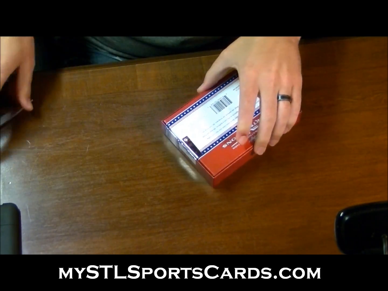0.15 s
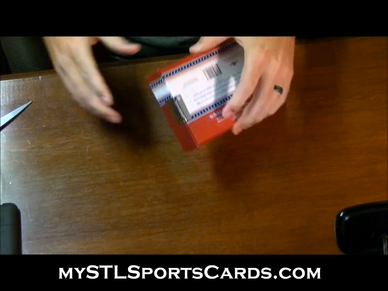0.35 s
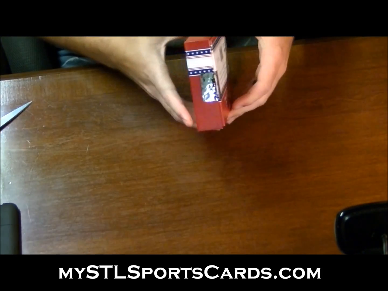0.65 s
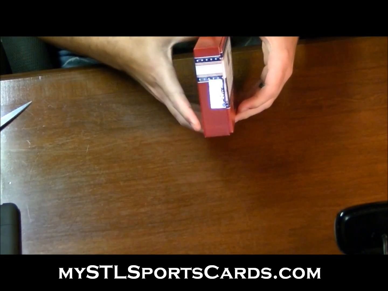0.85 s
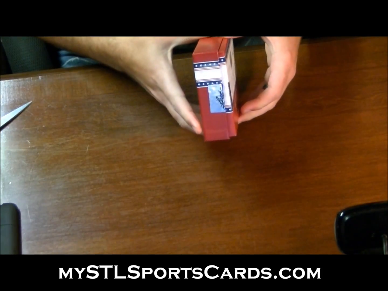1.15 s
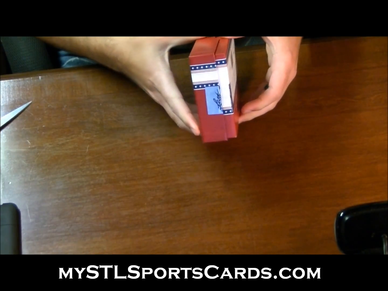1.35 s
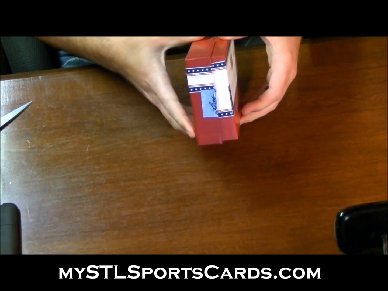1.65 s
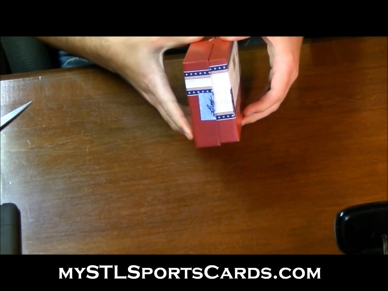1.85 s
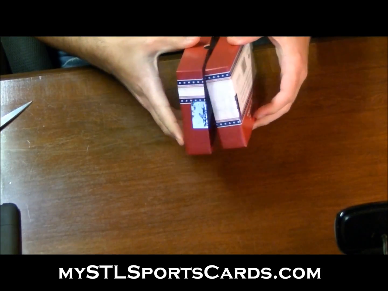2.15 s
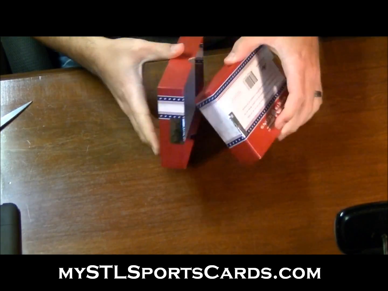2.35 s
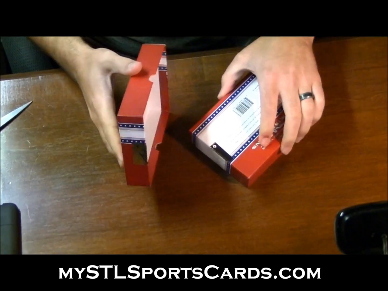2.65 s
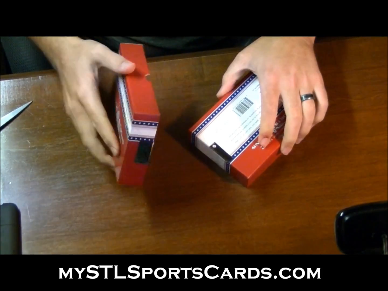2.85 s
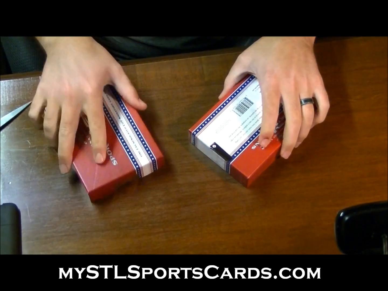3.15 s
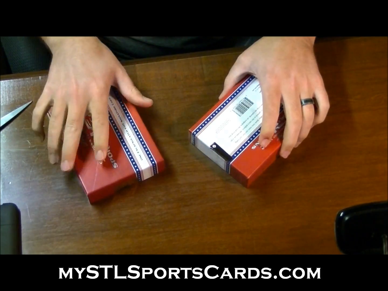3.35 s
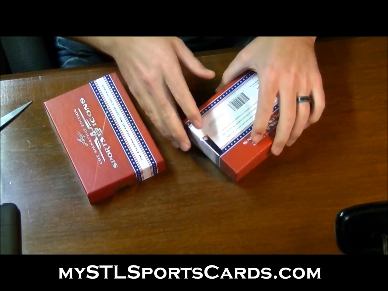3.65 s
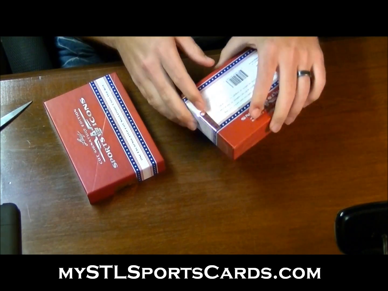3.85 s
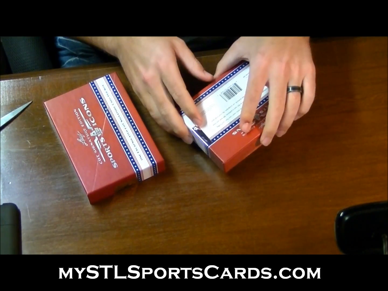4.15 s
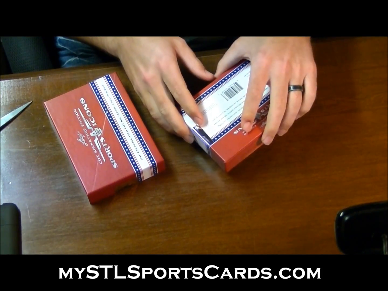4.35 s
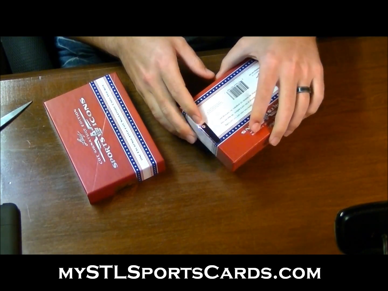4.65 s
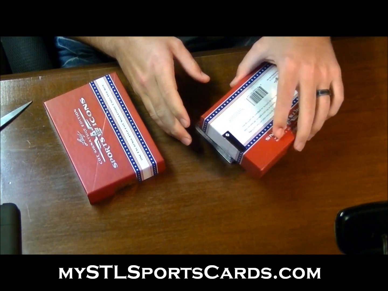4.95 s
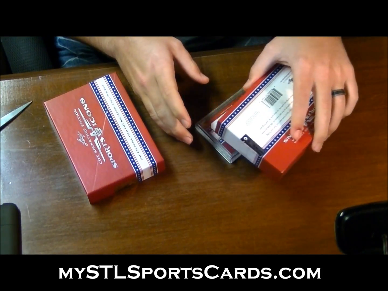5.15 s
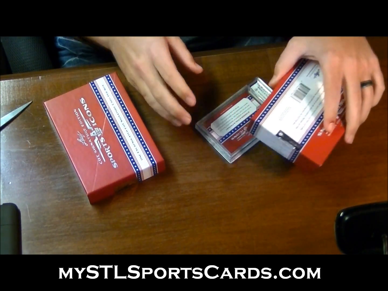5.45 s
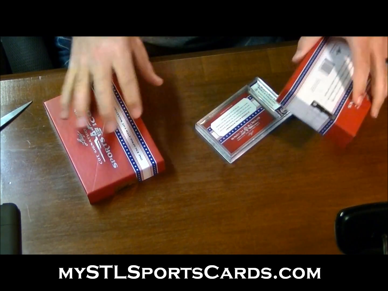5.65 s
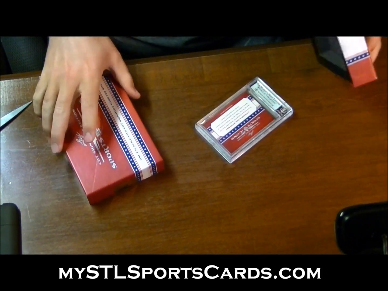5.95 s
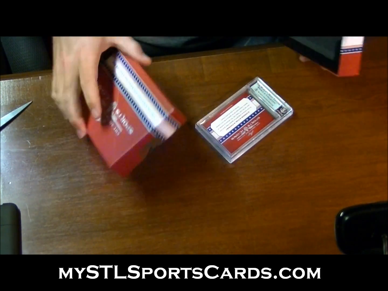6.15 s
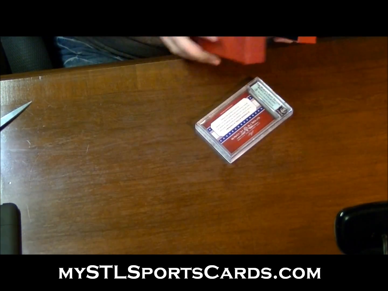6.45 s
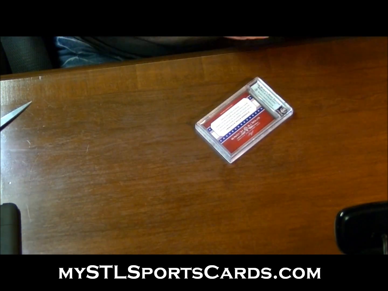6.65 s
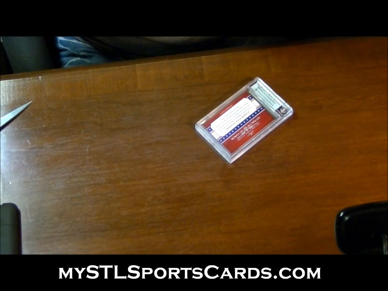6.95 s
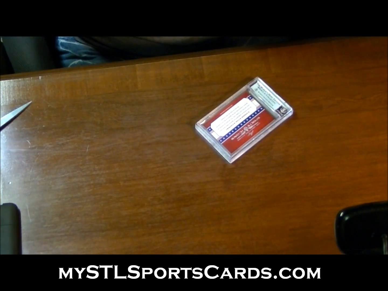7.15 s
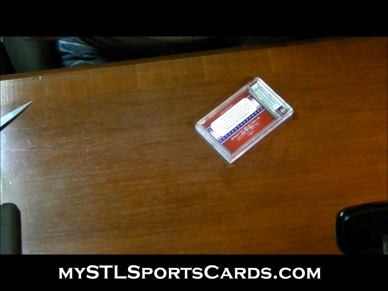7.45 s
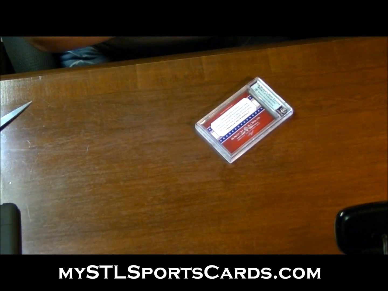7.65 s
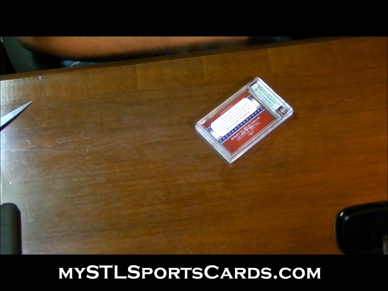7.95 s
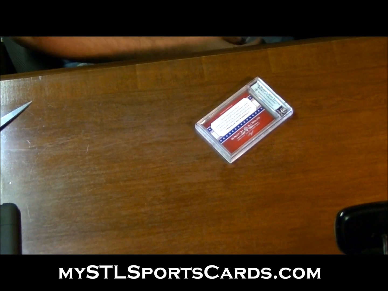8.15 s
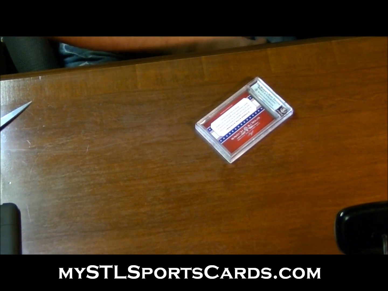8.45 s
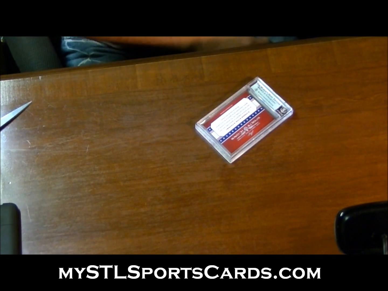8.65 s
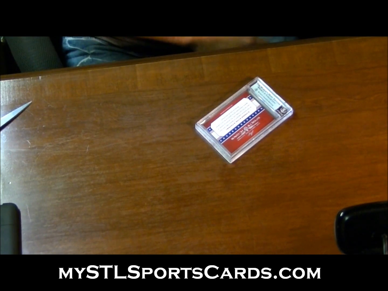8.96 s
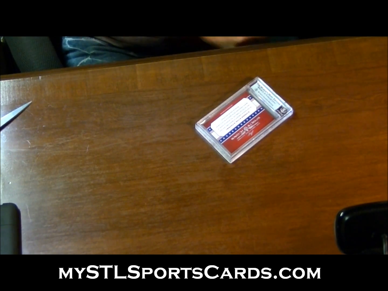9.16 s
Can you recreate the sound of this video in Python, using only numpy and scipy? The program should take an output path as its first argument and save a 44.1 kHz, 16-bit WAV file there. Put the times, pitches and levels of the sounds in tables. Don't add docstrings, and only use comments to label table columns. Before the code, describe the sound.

A quiet small furnished room with a steady soft ventilation hush, close stereo microphone at a wooden desk. At 0.15-0.3 s steel scissors clatter down with a sharp crack and short scraping bounces. Light taps and a soft low wrist thump follow around 0.55, a nail tick at 0.87. Cardboard rubs faintly from 0.8, growing until the lid lets go at 2.02-2.06 with two tiny squeaks. At 2.56 the box base lands, a loud hollow double knock with desk boom; at 3.18 the lid knocks, duller, with small settling touches. Soft handling leads to plastic holder knocks and rattle at 4.02-4.18. Near quiet until faint padded bumps at 5.9. From 6.54 to 6.9 the halves meet and seat further off, with muffled bumps and rubbing until 7.5, faint touches to 8. A forearm brushes at 8.5 and lands softly at 8.79, fading by 9.2 into hush.

```python
import sys
import numpy as np
from scipy import signal
from scipy.fft import rfft, irfft, next_fast_len
from scipy.io import wavfile
from scipy.ndimage import uniform_filter1d

SR = 44100
rng = np.random.default_rng(int(sys.argv[2]) if len(sys.argv) > 2 else 0)


def boost(x):
    u = np.asarray(x, float) / 20
    return 10 ** u


def materialize(psi):
    bounded = np.clip(np.atleast_2d(psi).T, -1, 1)
    quanta = np.round(bounded * 32767).astype(np.int16)
    wavfile.write(sys.argv[1], SR, quanta)


N = 410129

# (time [s], peak [dB], ring [Hz], crack [dB], ring [dB])
SCISSORS = [
    (0.137, -19.5, 2100, -1.5, -9),
    (0.161, -8.5, 1730, -0.5, -11),
    (0.168, -16.5, 1020, 6.5, 0),
    (0.177, -14.5, 1480, 1, -18),
    (0.217, -13, 1730, -9, -9),
    (0.235, -16, 2060, -14, -6),
    (0.299, -27, 974, -24, -1),
]
# (time [s], peak [dB], crack [dB], ring [dB], contact [ms])
BASE_KNOCKS = [
    (2.5552, 0, -15, -11.5, 0.59),
    (2.5582, -6, -15, -12.5, 0.95),
    (2.5685, -5.5, -20, 5, 3),
    (2.582, -19, -35, 0, 4),
    (2.61, -25, -40, 3, 5),
    (2.644, -27.5, -40, 8, 3.55),
]
# (time [s], peak [dB], crack [dB], ring [dB], contact [ms])
LID_KNOCKS = [
    (3.1805, -10, -40, 6, 0.53),
    (3.1885, -1, -33, 4, .9),
    (3.1985, -3, -22, -21, 0.55),
    (3.215, -17, -30, 5, 4.2),
    (3.234, -23, -30, -8, 4),
    (3.277, -34, -40, 6, 4),
    (3.382, -37.5, -55, 8.5, 2.4),
    (3.398, -33.5, -40, -1, 3),
    (3.459, -51, -32, 4, 2.1),
    (3.553, -42.5, -33, 3, 6.5),
]
# (time [s], peak [dB], crack [dB], ring [dB], contact [ms])
HOLDER_KNOCKS = [(3.984, -32.5, -13.5, -1, 1.94), (4.0205, -2.5, -25.5, 8, 1.83), (4.033, -8, -24, 4, 2.03),
                 (4.044, -11, -28.5, 5, 1.7), (4.054, -20, -28.5, 3, 5), (4.0785, -8, -14, 4.5, 2.5),
                 (4.099, -18, -19.5, -2, 1.86), (4.1113, 0, -7, 3, 0.5), (4.1172, -17, -16, -4, 0.78),
                 (4.123, -17, -22, 5, 2.7), (4.148, -25, -31, 2, 3.2), (4.182, -33, -30, 6, 2.3)]
# (time [s], peak [dB], ring [Hz], crack [dB], ring [dB])
TAPS = [
    (0.517, -35.5, 1100, -28, -6),
    (0.548, -29.5, 359, -22, 1),
    (1.824, -40, 1126, -31.5, -2),
    (2.067, -37, 334, -14, 14),
    (2.331, -41, 936, -33.5, -11),
    (2.826, -41.5, 298, -28.5, 4),
]
# (time [s], peak [dB], ring [Hz], crack [dB], ring [dB])
ELBOW = [
    (8.689, -29, 580, -26.5, -6),
    (8.737, -26, 375, -23.5, -6.5),
    (8.786, -18.5, 463, -30, -7.5),
    (8.795, -17.5, 363, -25, -3),
    (8.82, -30.5, 1000, -24.5, 2),
]
# (time [s], peak [dB], ring [Hz], crack [dB], ring [dB])
TICKS = [
    (.860, -35, 1140, -26, 3),
    (.8715, -38, 1040, -30, 0),
    (4.5045, -37, 2200, -24.5, -9.5),
    (7.557, -37, 2433, -31, -14),
    (7.5585, -45, 2930, -22, 0),
]
# (time [s], peak [dB], ring [Hz], crack [dB], ring [dB])
REFIT = [
    (6.541, -15, 791, -14.5, -11.5),
    (6.575, -25, 824, -32.5, -6),
    (6.652, -32.5, 753, -28, 9),
    (6.661, -27.5, 2310, -30, -6),
    (6.667, -30.5, 1350, -33, -5.5),
    (6.829, -22, 706.6, -29, -11.5),
    (6.89, -36.5, 330, -32, 6),
    (6.598, -40, 355, -35, 6),
    (7.983, -40.5, 443.8, -29, -5.5),
]
# (time [s], peak [dB], ring [Hz], crack [dB], ring [dB])
SNAGS = [
    (.168, -22.5, 7000, 4, -6),
    (.222, -25, 2280, 0, -7),
    (.017, -41.5, 1750, -2.5, -8),
    (2.026, -37, 1140, -12, -6),
    (2.054, -33, 2000, -4, -9),
    (2.878, -41.5, 1859, -28.5, 0),
]
# (time [s], peak [dB], ring [Hz], crack [dB], ring [dB])
BUMPS = [(5.850, -46, 860, -35, 0), (5.862, -46, 1000, -35, -5), (5.877, -39, 722, -34, -5),
         (5.888, -42.5, 620, -35, 1), (5.905, -46, 597, -40, 4), (5.965, -39, 760, -39, -1),
         (5.99, -47, 402, -39, 0), (7.053, -37.5, 446, -32, 10), (7.239, -35.5, 413, -30, 9),
         (7.247, -34.5, 414, -30, 9), (7.260, -36, 432, -30, 4), (7.274, -38.5, 410, -30, 3),
         (7.289, -43, 413, -30, 3), (7.377, -35.5, 387, -30, 4), (7.398, -37, 370, -27, 6),
         (7.415, -41, 368, -29.5, 1), (7.639, -42.5, 383.6, -21, 4), (7.805, -40.5, 322, -29, 2)]

# (frequency [Hz], level [dB per Hz])
STEEL = [(200, -14), (449, -6.5), (663, -45), (1010, -3), (1090, -3.5), (1730, -4.5), (2290, -6.5),
         (2550, -5), (5000, -20), (6500, -47)]
# (frequency [Hz], level [dB per Hz])
BASE_BODY = [(200, -18), (729, -4.5), (868, -7.5), (1170, -2.5), (1450, -11.5), (1700, -6), (2380, -6.5),
             (3200, -11.5), (5000, -31), (6500, -66.5)]
# (frequency [Hz], level [dB per Hz])
LID_BODY = [(200, -29), (338, -11), (480, -30), (570, -28), (790, -9.5), (1250, -7), (1500, -13),
            (1850, -6.5), (2550, -20), (3080, -17), (5000, -48.5), (6500, -74)]
# (frequency [Hz], level [dB per Hz])
HOLDER_BODY = [(200, -29), (357, -28), (443, -27.5), (603, -48), (892, -8), (1250, -22.5), (1800, -15),
               (2140, -19), (2500, -18), (3400, -25), (5000, -34.5), (6500, -69)]
# (frequency [Hz], level [dB per Hz])
CARD = [(200, -9.5), (347, -6), (549, -17.5), (812, -5), (967, -8), (1750, -14), (2230, -24.5),
        (3080, -24.5), (5000, -32.5), (6500, -63)]
# (frequency [Hz], level [dB per Hz])
NAIL = [(700, -30), (1050, 3), (1600, -6), (2600, -3.5), (5200, -18)]
# (frequency [Hz], level [dB per Hz])
HELD = [(200, -15), (400, -1), (550, -6), (800, -5.5), (1150, -6), (1400, -31), (3000, -36), (5200, -50)]
# (frequency [Hz], level [dB per Hz])
REFIT_BODY = [(200, -11), (350, -4.5), (550, -17), (800, -3), (1300, -7), (2000, -12), (3000, -16.5),
              (5000, -28)]

# (frequency [Hz], level [dB], 60 dB decay [s])
BASE_WALLS = [(417, -26, .06), (670, -14, 0.072), (1130, -12, .03), (2000, -14, .03), (2170, -10, .025),
              (2455, -16, .03), (3070, -10, .02)]
# (frequency [Hz], level [dB], 60 dB decay [s])
LID_WALLS = [(364, -16, .06), (1238, -14, .04), (1671, -16, .05), (1841, -12, .03), (2315, -18, .03),
             (3068, -16, .03)]
# (frequency [Hz], level [dB], 60 dB decay [s])
HOLDER_WALLS = [(362, -24, .06), (1400, -24, .05), (1830, -20, .04), (2480, -22, .04), (3450, -18, .035)]
# (frequency [Hz], level [dB], 60 dB decay [s])
REFIT_WALLS = [(355, -11.5, 0.073), (1760, -8, 0.035), (2094, -12, 0.039), (2945, -14, .03),
               (3970, -20, .02)]

# (start [s], peak [s], end [s], body [dB], hiss [dB])
SKID = [
    (0.135, 0.142, 0.18, -45, -39),
    (0.16, 0.168, 0.22, -44, -36),
    (0.19, 0.225, 0.3, -41.5, -40.5),
    (0.24, 0.265, 0.36, -44, -48),
]
# (start [s], peak [s], end [s], body [dB], hiss [dB])
SLIDE = [
    (.75, 1.1, 1.7, -64.5, -85),
    (1.2, 1.96, 2.32, -52.5, -69),
    (1.4, 1.58, 1.97, -66.5, -84),
    (2.0, 2.06, 2.123, -51.5, -46),
]
# (start [s], peak [s], end [s], body [dB], hiss [dB])
HANDLE = [(.52, .8, 1.1, -59, -83), (.9, 1.2, 1.7, -60, -82), (2.74, 2.82, 2.9, -59.5, -71),
          (2.82, 2.904, 3, -55.5, -78), (3.33, 3.356, 3.43, -55, -72), (3.45, 3.57, 3.82, -55.5, -74),
          (3.66, 3.76, 4.02, -73, -64.5), (3.92, 3.975, 4.08, -49.5, -56.5), (4.0, 4.02, 4.06, -29.5, -50),
          (4.2, 4.32, 5.1, -72, -71), (5.78, 5.87, 5.95, -61.5, -76.5), (6.54, 6.57, 6.7, -45.5, -57),
          (6.58, 6.7, 6.9, -54, -66.5), (6.815, 6.832, 6.855, -41, -53), (6.85, 7.09, 7.5, -55.5, -74),
          (7.19, 7.225, 7.25, -53, -56.5), (7.23, 7.265, 7.42, -48.5, -57.5), (7.3, 7.36, 7.38, -52, -57.5),
          (7.37, 7.42, 7.53, -53, -63.5), (7.62, 7.68, 7.78, -50.5, -60.5), (7.86, 7.9, 7.9, -59, -73.5),
          (7.93, 8.05, 8.1, -66, -73)]
# (start [s], peak [s], end [s], body [dB], hiss [dB])
ARM = [
    (8.46, 8.51, 8.6, -55.5, -60.5),
    (8.52, 8.6, 8.72, -52, -58),
    (8.6, 8.73, 8.84, -48, -58),
    (8.77, 8.792, 8.85, -41.5, -53),
    (8.78, 8.89, 9.04, -50.5, -60),
    (8.97, 9.06, 9.24, -64, -74.5),
]
# (start [s], peak [s], end [s], body [dB], hiss [dB])
RATTLE = [
    (4.018, 4.03, 4.07, -37, -57.5),
    (4.06, 4.085, 4.155, -41.5, -58),
    (4.095, 4.112, 4.14, -37, -71),
    (4.11, 4.14, 4.24, -48.5, -67.5),
]
# (start [s], peak [s], end [s], body [dB], hiss [dB])
CATCH = [
    (2.01, 2.024, 2.05, -39, -49),
    (2.045, 2.06, 2.14, -40, -58),
    (3.56, 3.76, 3.87, -61, -70),
    (6.56, 6.66, 6.76, -47.5, -62),
    (6.68, 6.8, 7.06, -53, -67.5),
]

# (frequency [Hz], width [Hz], level [dB])
SKID_BODY = [(1000, 610, 0), (1730, 240, 1.5), (2390, 1100, -4), (3500, 1300, -24.5)]
# (frequency [Hz], width [Hz], level [dB])
SLIDE_BODY = [(448, 103, -0.5), (850, 140, -1), (1202, 153, 5.5), (2010, 380, 1), (3200, 900, -7.5)]
# (frequency [Hz], width [Hz], level [dB])
HAND_BODY = [(221, 120, 3), (398, 150, 3), (854, 690, 3.5), (1300, 760, 5), (2200, 560, 3),
             (3600, 1400, -8)]
# (frequency [Hz], width [Hz], level [dB])
ARM_BODY = [(360, 510, -1), (696, 470, 1.5), (1260, 820, 5), (2560, 1650, 1), (3460, 670, 0.5)]
# (frequency [Hz], width [Hz], level [dB])
RATTLE_BODY = [(1324, 250, 5.5), (1800, 200, 1.5), (2478, 100, 4), (3400, 300, -7), (4496, 1205, -1.5)]
# (frequency [Hz], width [Hz], level [dB])
CATCH_BODY = [(1280, 110, 1.5), (1997, 152, 2.5), (2800, 760, -2), (3400, 200, -2), (3900, 140, -3),
              (5020, 400, -6)]
# (frequency [Hz], level [dB per Hz])
HISS = [(2060, -29), (3500, -2), (4040, -1), (4750, -7), (6520, -2.5), (8580, -8), (10100, -7), (11500, -5),
        (14300, -13), (15500, -35)]
# (start [s], length [s], pitch [Hz], end pitch [ratio], level [dB])
SQUEAKS = [(.005, 0.051, 1780, 0.93, -51), (0.076, 0.069, 1760, 0.95, -53), (2.011, .016, 2700, 1.2, -40),
           (2.02, 0.026, 3400, 0.97, -31.5), (2.018, 0.022, 5100, 0.95, -40), (2.022, .016, 6900, 1, -48),
           (2.032, 0.024, 1280, 1.03, -39), (2.050, .016, 2010, 1, -30.5), (2.054, 0.015, 2850, .98, -32.5),
           (2.053, .018, 3450, .97, -35), (2.049, 0.013, 5000, 1, -39), (2.055, .015, 6900, 1.03, -45),
           (5.19, .06, 480, 0.97, -59.5), (6.599, .055, 3450, 1, -52), (6.75, .05, 1280, 1, -55),
           (6.884, 0.027, 1190, .97, -49), (7.211, .025, 5300, 1, -55), (7.212, .022, 5900, 0.84, -57),
           (7.21, .025, 7350, 1, -57), (7.24, .025, 5300, 1.1, -57), (7.24, .025, 7350, 1, -56),
           (7.345, .025, 7200, 1, -57)]

# (frequency [Hz], 60 dB decay [s], level [dB])
ROOM = [(150, 0.11, -8.5), (391, 0.23, -2), (910, 0.14, -8), (2019, 0.24, -10.5), (4802, 0.31, -12.5),
        (9700, .13, -18)]
# (frequency [Hz], level [dB per Hz])
AIR = [(15, -62.5), (25, -28), (48, -12), (107, -7.5), (340, -9.5), (378, -6.5), (469, -5.5), (552, -13),
       (741, -14.5), (848, -8), (1170, -15.5), (2560, -20), (3440, -26), (14300, -38.5), (15500, -48.5)]
# (frequency [Hz], level [dB])
AIR_SIDE = [(25, -8), (60, -3), (110, -2.5), (200, 4.5), (380, 2.5), (700, 2), (1290, 1.5), (2380, 1),
            (4400, 1), (8120, 0.5), (15000, -3)]

# (pitch [Hz], second mode [ratio], its share [ratio])
BASE_RING, LID_RING, HOLDER_RING = (868, 0.745, 0.22), (775, 0.82, 0.36), (908, 0.93, 0.28)
LOOSE_PAIR = (1.13, 0.4)


def mode_crowd(t, body, body_t60, contact_ms, place, turn, late):
    count = len(place)
    hz = 200 + 5000 * ((np.arange(count)[:, None] + place) / count) ** 1.5
    since = np.maximum(t + np.log(1 - late) * contact_ms / 1000, 0)
    body_hz, body_db = np.transpose(body)
    level = boost(np.interp(np.log(hz), np.log(body_hz), body_db))
    gain = level * np.sign(turn - 0.5) * (hz / 1000) ** 0.7
    decay = fade(since, body_t60 * (1000 / hz) ** 0.5)
    return (gain * decay * np.sin(2 * np.pi * hz * since)).sum(axis=0)


def hollow_ring(t, hz, pair, t60):
    ratio, share = pair
    first = fade(t, t60) * np.sin(2 * np.pi * hz * t)
    second = share * fade(t, t60 / ratio ** 2) * np.sin(2 * np.pi * ratio * hz * t)
    return first + second


def wall_ring(t, walls, turn):
    total = 0
    for k, (hz, db, t60) in enumerate(walls):
        gain = (-1) ** k * boost(db + 8 * turn[k, 0] - 4)
        total = total + gain * fade(t, t60) * np.sin(2 * np.pi * hz * t)
    return total


def knocks(events, body, pair, body_t60, ring_t60, crack_t60, pan_db, walls=(), left=1, buzz_db=-8):
    low, high = np.zeros(N + SR), np.zeros((2, N + SR))
    t = np.arange(SR // 12) / SR
    treble = signal.butter(1, [3000, 11500], "band", fs=SR)
    for s, peak_db, ring_hz, crack_db, ring_db, contact_ms in events:
        place, turn, late = rng.random((3, 40, 1))
        noise = rng.standard_normal((2, len(t)))
        noise[0, 14] = 7
        crowd = mode_crowd(t, body, body_t60, contact_ms, place, turn, late)
        swell = 1 - np.exp(-1000 * t / max(contact_ms, 0.1))
        ring = swell * hollow_ring(t, ring_hz, pair, ring_t60)
        buzz = colour(noise[1], body) * fade(t, 1.5 * body_t60)
        thud = swell * (wall_ring(t, walls, turn) + boost(buzz_db) * peak_one(buzz))
        thud = thud + peak_one(crowd) + boost(ring_db) * peak_one(ring)
        crack = signal.lfilter(*treble, signal.lfilter(*treble, noise))
        crack = crack * fade(t, crack_t60) * np.minimum(t / 0.00026, 1)
        i = int(s * SR)
        span = slice(i, i + len(t))
        low[span] *= left + (1 - left) * np.exp(-t / 0.0008)
        low[span] += boost(peak_db) * peak_one(thud)
        high[:, span] += boost(peak_db + crack_db) * peak_one(crack)
    return ports(low[:N], high[:, :N], pan_db)


def loose(events, contact_ms, body, **decays):
    return knocks([(*row, contact_ms) for row in events], body, LOOSE_PAIR, **decays)


def hollow(events, ring, body, **decays):
    rows = [(s, db, ring[0], *rest) for s, db, *rest in events]
    return knocks(rows, body, ring[1:], **decays)


def rub(strokes, body, rate, grain_db, patchy_db, body_db, hiss_db, swell_db, bend):
    first, last = int(strokes[0][0] * SR), int(strokes[-1][2] * SR)
    size = 4096 * ((last - first) // 4096 + 1)
    gains, out = np.zeros((2, N)), np.zeros((2, N + size))
    happens = rng.random((2, size)) < np.array([[rate], [4 * rate]]) / SR
    slips = happens * boost(grain_db * rng.exponential(size=(2, size)))
    push = slips[0] * rng.standard_normal(size)
    low = np.zeros(size)
    for k, (hz, width, db) in enumerate(body):
        mode = band(band(push, hz, 1.8 * width), hz, 1.8 * width)
        low += (-1) ** k * boost(db) * mode / np.sqrt(width)
    low = unit(low)
    high = unit(colour(slips[1] * rng.standard_normal((2, size)), HISS))
    for start, peak, end, low_db, high_db in strokes:
        span = np.arange(int(start * SR), int(end * SR))
        slack = np.interp(span / SR, [start, peak, end], [1, 0, 1])
        press = boost(-swell_db * slack ** bend)
        gains[:, span] += [boost(low_db + body_db) * press, boost(high_db + hiss_db) * press ** 1.3]
    low_gain, high_gain = np.pad(gains, ((0, 0), (0, size)))[:, first:first + size]
    out[:, first:first + size] = ports(low * low_gain, high * high_gain, pan_db=1.0)
    return out[:, :N] * boost(patchy_db * walk(40))


def squeaks(rough):
    out = np.zeros(N)
    for s, length, hz, ratio, db in SQUEAKS:
        t = np.arange(int(length * SR)) / SR
        waver = uniform_filter1d(rng.standard_normal((2, SR // 8)), 130)[:, :len(t)] * 11
        glide = hz * ratio ** (t / length)
        phase = 2 * np.pi * np.cumsum(glide) / SR + rough * waver[0]
        swell = np.sin(np.pi * t / length) * (1 + 0.3 * rough * waver[1])
        i = int(s * SR)
        out[i:i + len(t)] += boost(db) * swell * np.sin(phase)
    return ports(out, np.zeros((2, N)), pan_db=0.0)


def desk(hits):
    t = np.arange(SR // 2) / SR
    boom = (1 - np.exp(-t / 0.023)) * fade(t, 0.34) * np.sin(2 * np.pi * 69.6 * t)
    wrist = boost(37) * (np.arange(N) == int(0.57 * SR))
    push = np.abs(hits) ** 0.54 + wrist
    return boost(-42.5) * signal.fftconvolve(push, boom)[:N] / 100


def room(x):
    t, tail = np.arange(SR // 2) / SR, 0
    for hz, t60, db in ROOM:
        mid, side = band(rng.standard_normal((2, len(t))), hz, hz)
        both = mid + min(hz / 1200, 1) * side * np.array([[1], [-1]])
        both = both * fade(t, t60) * np.minimum(t / 0.0079, 1)
        tail = tail + boost(db) * both / np.sqrt(t60 * SR / 14)
    return signal.fftconvolve(x[None], tail, axes=1)[:, :N]


def air():
    mid, side = rng.standard_normal((2, N))
    mid, side = colour(np.array([mid, colour(side, AIR_SIDE)]), AIR)
    gain = boost(-59.5) / np.sqrt(np.mean(mid ** 2))
    return gain * np.array([mid + side, mid - side]) * boost(np.array([[0.4], [-0.4]]))


def ports(low, high, pan_db):
    body = np.array([np.roll(low, 3), low])
    body = body * boost(pan_db * np.array([[0.5], [-0.5]]))
    return body + high[0] + 1.2 * high[1] * np.array([[1], [-1]])


def colour(x, table):
    hz, db = np.transpose(table)
    size = next_fast_len(x.shape[-1])
    f = np.maximum(np.arange(size // 2 + 1) * SR / size, 1)
    gain = boost(np.interp(np.log(f), np.log(np.maximum(hz, 1)), db))
    return irfft(rfft(x, size) * gain, size)[..., :x.shape[-1]]


def band(x, hz, width):
    return signal.lfilter(*signal.iirpeak(hz, hz / width, fs=SR), x)


def fade(t, t60):
    return np.exp(-np.log(1000) * t / t60)


def walk(rate):
    k = int(SR / rate)
    steps = np.repeat(rng.standard_normal(N // k + 1), k)
    return 1.9 * uniform_filter1d(uniform_filter1d(steps, k), k)[:N]


def unit(x):
    return x / np.sqrt(np.mean(x ** 2))


def peak_one(x):
    return x / np.abs(x).max()


def scene():
    hits = loose(SCISSORS, 4.2, STEEL, body_t60=0.031, ring_t60=0.023, crack_t60=0.047, pan_db=0.0, left=0.55)
    hits += hollow(BASE_KNOCKS, BASE_RING, BASE_BODY, body_t60=0.068, ring_t60=0.038, crack_t60=0.026,
                   pan_db=1.5, walls=BASE_WALLS, left=0.55, buzz_db=-5)
    hits += hollow(LID_KNOCKS, LID_RING, LID_BODY, body_t60=0.042, ring_t60=0.035, crack_t60=0.035,
                   pan_db=2.5, walls=LID_WALLS, left=0.6, buzz_db=-5.5)
    hits += hollow(HOLDER_KNOCKS, HOLDER_RING, HOLDER_BODY, body_t60=0.03, ring_t60=0.06, crack_t60=0.014,
                   pan_db=2.5, walls=HOLDER_WALLS, left=0.3, buzz_db=-10)
    hits += loose(REFIT, 1.5, REFIT_BODY, body_t60=0.031, ring_t60=0.06, crack_t60=0.031, pan_db=2.5,
                  walls=REFIT_WALLS)
    hits += loose(BUMPS, 4, HELD, body_t60=0.033, ring_t60=0.054, crack_t60=0.04, pan_db=3.5)
    hits += loose(TAPS + ELBOW, 2.7, CARD, body_t60=0.032, ring_t60=0.067, crack_t60=0.042, pan_db=1.7)
    hits += loose(SNAGS, 3.2, STEEL, body_t60=0.028, ring_t60=0.046, crack_t60=0.022, pan_db=-1.0)
    hits += loose(TICKS, 0.635, NAIL, body_t60=0.026, ring_t60=0.026, crack_t60=0.022, pan_db=1.0)

    rubs = rub(SKID, SKID_BODY, rate=1900, grain_db=1.0, patchy_db=2.5, body_db=11, hiss_db=3.5,
               swell_db=24.5, bend=1.77)
    rubs += rub(SLIDE, SLIDE_BODY, rate=3500, grain_db=1.5, patchy_db=0.0, body_db=3.0, hiss_db=2.5,
                swell_db=15, bend=0.97)
    rubs += rub(HANDLE, HAND_BODY, rate=4000, grain_db=1.5, patchy_db=1.5, body_db=-1.5, hiss_db=0.84,
                swell_db=16.5, bend=1.5)
    rubs += rub(ARM, ARM_BODY, rate=4500, grain_db=1.93, patchy_db=1.0, body_db=5.0, hiss_db=9.5,
                swell_db=19.5, bend=1.82)
    rubs += rub(RATTLE, RATTLE_BODY, rate=1500, grain_db=1.0, patchy_db=4.5, body_db=1.5, hiss_db=4.5,
                swell_db=17, bend=4.0)
    rubs += rub(CATCH, CATCH_BODY, rate=2500, grain_db=2.5, patchy_db=2.5, body_db=0.2, hiss_db=2.0,
                swell_db=21.5, bend=1.196)

    no_bass = signal.butter(2, 190, "high", fs=SR, output="sos")
    near = signal.sosfilt(no_bass, hits + rubs + squeaks(rough=0.85))
    return near + room(near.mean(axis=0)) + desk(hits.mean(axis=0)) + air()


def band_limit(x):
    return signal.sosfilt(signal.butter(12, 16460, fs=SR, output="sos"), x)


def record(dry):
    rounded = np.tanh(0.79 * dry) / 0.86
    top_cut = signal.ellip(8, 0.2, 60, 15600, fs=SR, output="sos")
    mix = signal.sosfilt(top_cut, rounded)
    return band_limit(mix)


dry = scene()
out = record(dry)
materialize(out)
```